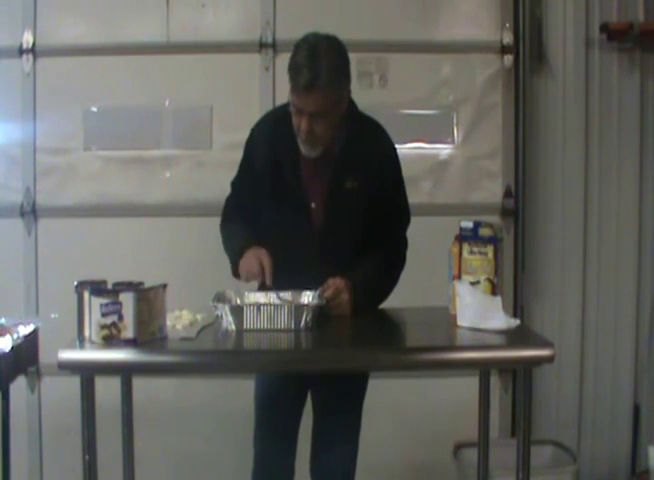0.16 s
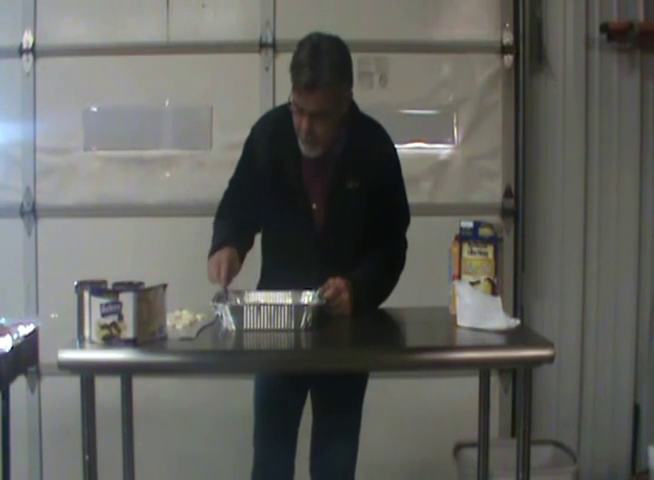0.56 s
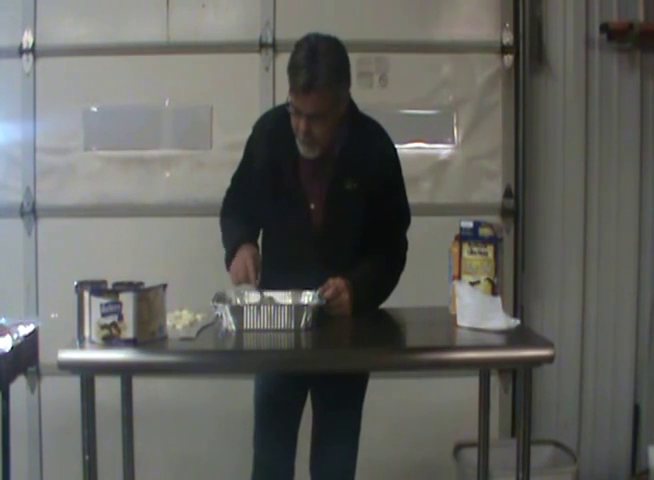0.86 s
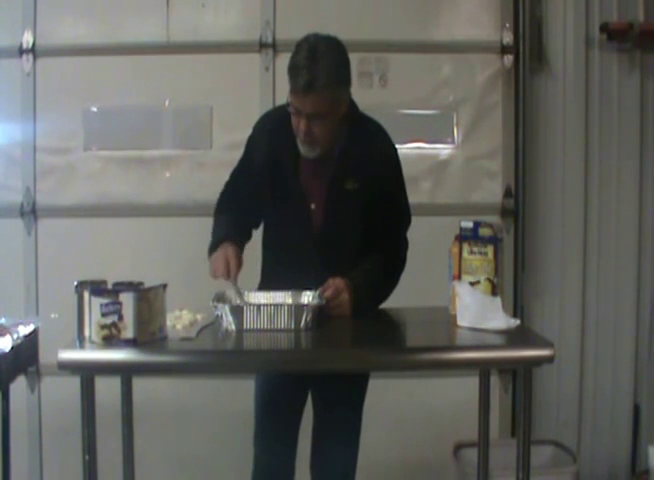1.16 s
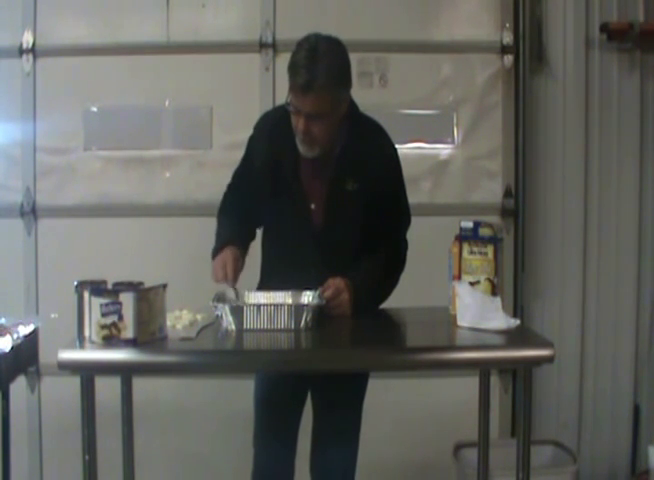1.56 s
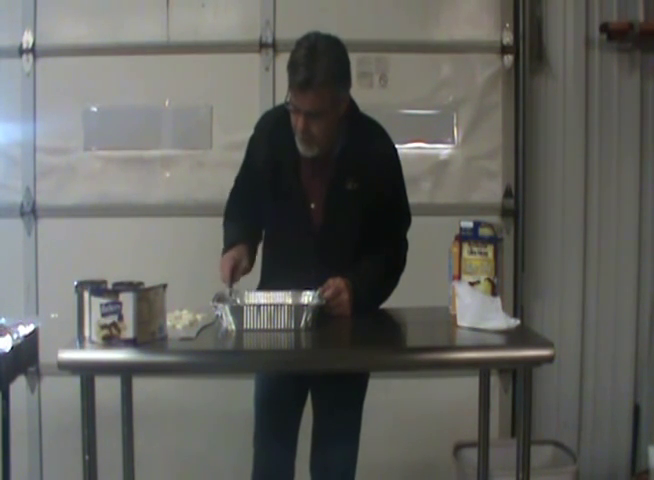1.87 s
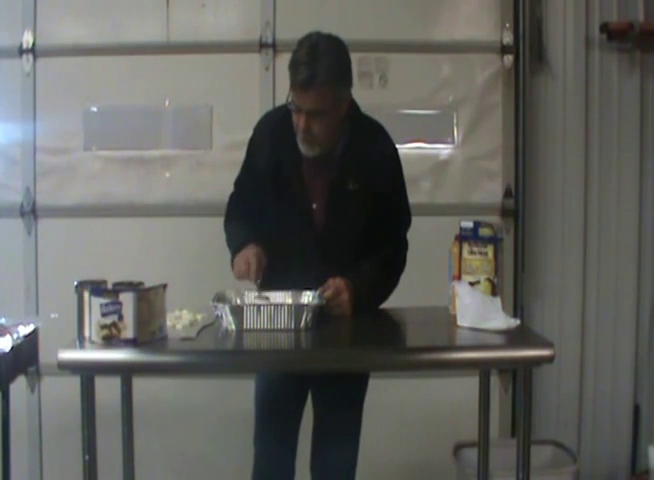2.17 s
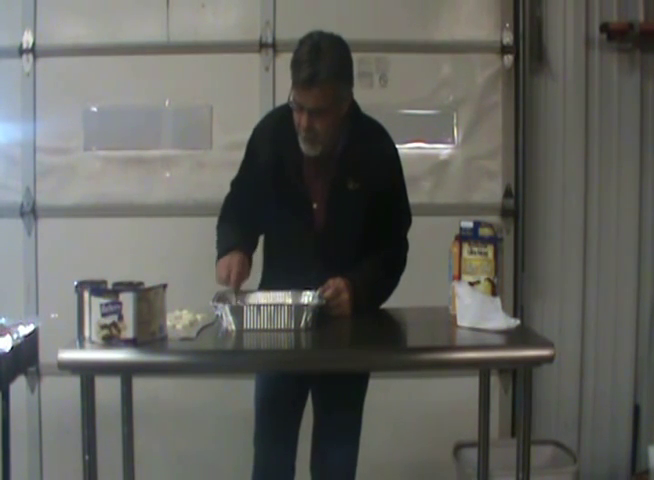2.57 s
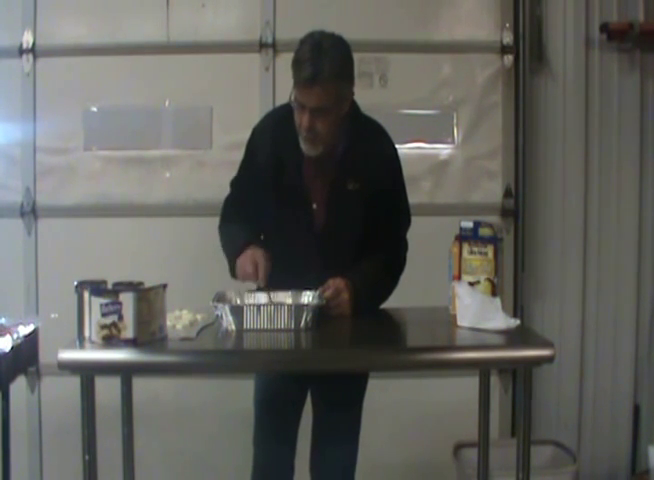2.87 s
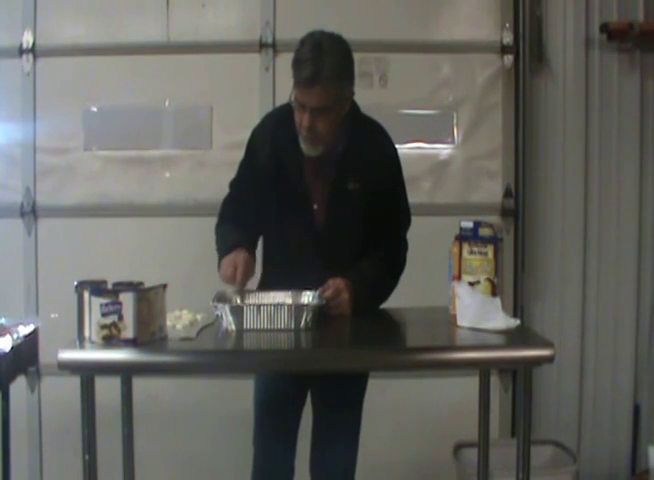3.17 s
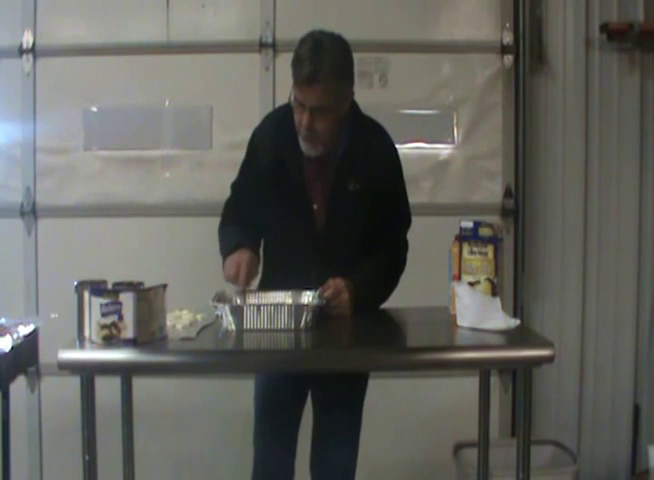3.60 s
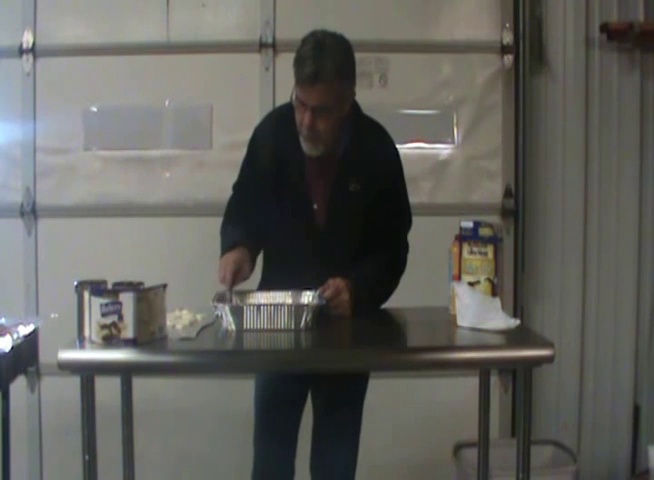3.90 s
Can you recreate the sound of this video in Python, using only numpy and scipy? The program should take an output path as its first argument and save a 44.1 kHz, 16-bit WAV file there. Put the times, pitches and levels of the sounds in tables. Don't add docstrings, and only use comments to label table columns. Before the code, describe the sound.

A utensil scrapes dry powder in a thin foil pan, with light taps, a tinny clatter and sharp metallic snaps over a low machine drone.

```python
import sys
import numpy as np
from scipy import signal
from scipy.fft import rfft, irfft
from scipy.io import wavfile

SR = 44100
rng = np.random.default_rng(int(sys.argv[2]) if len(sys.argv) > 2 else 0)


def ratio(d):
    e = np.asarray(d, float) / 20
    return 10 ** e


def wav_record(signal):
    frames = np.transpose(np.atleast_2d(signal))
    bounded = np.clip(frames, -1, 1)
    quanta = np.round(bounded * 32767).astype(np.int16)
    wavfile.write(sys.argv[1], SR, quanta)


N = 178252

DRONE_HZ = (106.2, 155.2)
# time in seconds, level in dB.
LOW_NOTE = [(0., -53), (.1, -53), (.83, -59), (1.1, -73.5), (1.57, -73), (1.75, -60.5), (2.37, -78.5),
            (2.55, -65.5), (3.34, -65), (3.58, -78), (3.72, -59), (4.04, -69)]
# frequency in Hz, level in dB.
CHURN_COLOUR = [(50, -48.5), (90, -19), (130, 5), (200, -1), (320, -2.5), (450, -33), (800, -71.5)]
# multiple of the mains frequency (a plain number), level in dB.
MAINS_OVERTONES = [(5, -77), (6, -82), (7, -79), (9, -77), (10, -84), (11, -85), (13, -86), (18, -83),
                   (24, -89), (34, -87)]
# frequency in Hz, level in dB.
WHINE = [(11719, -87), (12080, -94)]
# frequency in Hz, level in dB.
AIR_COLOUR = [(20, -22), (55, -1), (110, 2), (200, -6.5), (330, -14.5), (450, -20), (1000, -24.5),
              (2200, -24), (3800, -29), (5000, -26.5), (6500, -30), (11500, -30), (15750, -32),
              (16000, -76)]

# frequency in Hz, time to fall by 60 dB in seconds.
GARAGE_FADE = [(200, 0.49), (500, 0.26), (1200, 0.44), (2700, .5), (5000, 0.66), (8000, 0.75),
               (12000, 0.76)]
# frequency in Hz, level in dB.
GARAGE_COLOUR = [(200, 14), (700, 3.5), (2000, -1.3), (3000, 1.5), (4300, -0.5), (4900, 5.5), (5500, -0.5),
                 (8000, -0.5), (14000, -3)]
FAR_DB = (2.6, -0.64, -3.4)

# start in seconds, hardest moment in seconds,
# end in seconds, rasp level in dB, fizz against the rasp in dB.
STROKES = [(0., 0.007, 0.26, -69.5, -9), (.1, .36, 0.83, -71.5, 1), (0.447, 0.73, 0.85, -70.5, 1.5),
           (.78, .93, 1.7, -72.5, -2), (0.56, 0.594, 0.61, -61, -5), (1.086, 1.098, 1.25, -52, -4),
           (1.376, 1.38, 1.456, -58.5, -5.5), (2.194, 2.25, 2.305, -74, 6.5), (2.56, 2.63, 2.5, -77, 2),
           (2.716, 2.728, 2.752, -54.5, -1.5), (2.737, 2.79, 2.9, -75, 4), (3.052, 3.103, 3.16, -73, -4),
           (3.16, 3.2, 3.4, -72, -4), (3.225, 3.25, 3.3, -66.5, -4.5), (3.686, 3.715, 3.5, -71.5, -3),
           (3.796, 3.847, 3.88, -61.5, -3.5), (3.838, 3.883, 3.95, -57.5, -6.5),
           (3.87, 3.924, 3.935, -61, 7)]
# frequency in Hz, level in dB.
RASP_COLOUR = [(250, -37), (500, -16), (900, -3), (1400, -3.5), (2500, -3.5), (3300, -8), (4200, -21.5),
               (6500, -67)]
# frequency in Hz, level in dB.
FIZZ_COLOUR = [(2500, -18), (3800, -5.5), (4900, 0.5), (5800, -3.5), (7500, -3.5), (9500, -6), (12000, -18),
               (14500, -28), (16500, -45)]

# factor on the main pitch (a plain number), level in dB, time to fall by 60 dB in seconds.
HARD_THUD = [(1.024, 13.5, 0.0059), (2., -3.5, 0.012), (.55, -12, 0.014), (1.45, -8, 0.0083)]
HARD_WALL = [(1.03, -0.5, 0.013), (0.862, -6, 0.008), (1.167, -9, 0.0066)]
LIGHT_THUD = [(1.005, 0, 0.013), (1.94, -13.5, 0.0084), (0.554, -11, 0.011), (1.4, -18.5, 0.011)]
LIGHT_WALL = [(0.989, -2, 0.0083), (0.69, -19.5, 0.0072), (0.63, -21.5, 0.0069)]
# frequency in Hz, level in dB.
CRACKLE_COLOUR = [(600, -33.5), (1200, 0), (2500, -9.5), (3800, -5.5), (4800, -4), (5700, -0.5), (7000, 0),
                  (9000, -5), (11000, -11), (13000, -22), (16500, -36)]
# frequency in Hz, level in dB.
SHIVER_COLOUR = [(200, -13.5), (500, 3.5), (1000, -1), (2500, -0.5), (3900, -2.5), (4800, -5),
                 (8000, -15.5), (12000, -22.5), (16500, -38.5)]

# time in seconds, level in dB, pitch in Hz, crackle against the tap in dB.
TAPS = [(.13, -52, 1070, -12), (.318, -49, 1070, -14), (.58, -50, 1290, 5), (0.591, -42.5, 1410, -7),
        (.637, -46.5, 1050, -21), (.687, -56, 1410, -2.5), (.981, -51.5, 1190, -14),
        (1.38, -46.5, 950, -12), (1.388, -45, 920, -15), (2.632, -58, 1260, -5), (2.7212, -30, 1098, -18),
        (2.7244, -49, 420, -3), (2.7293, -40.5, 1100, -1), (2.737, -46, 1340, 5), (3.184, -56.5, 1140, -6),
        (3.193, -49.5, 1180, -5), (3.21, -45, 1220, -17), (3.251, -57, 820, -5), (3.259, -52, 1250, -9),
        (3.306, -56, 332, -12), (3.664, -56.5, 1090, -14), (3.811, -58, 1370, -5), (3.852, -41.5, 1340, -1),
        (3.875, -51, 1400, .3), (3.888, -47, 1240, -13), (3.9, -51, 1510, -5), (3.911, -59, 1300, 9)]
# time in seconds, level in dB, pitch in Hz, crackle against the ring in dB.
PINGS = [(.292, -60, 7560, -1), (.564, -50, 7100, -1.5), (1.356, -50, 2420, -1), (1.383, -42.5, 2800, -4),
         (1.388, -39, 2390, -9.5), (1.391, -48, 5320, 3), (1.421, -61, 2300, 1), (1.483, -67, 1700, 12),
         (2.619, -58, 1710, -3), (2.7243, -43, 2700, 4), (2.7308, -43, 2400, -6), (2.7674, -46, 1540, 1),
         (2.789, -55, 5650, -14), (3.3426, -43.5, 1510, -13), (3.6472, -41, 4800, -18),
         (3.7966, -48.5, 2030, -2), (3.854, -42.5, 4870, -7), (3.836, -52, 3270, -1.5),
         (3.849, -38, 1570, -4)]
# time in seconds, thud in dB, thud pitch
# in Hz, wall ring against the thud in dB, wall pitch in Hz.
CLATTER = [(1.0324, -13.5, 642, -12.5, 3100), (1.038, -23, 666, -21, 5400), (1.049, -29.5, 970, -6, 2340),
           (1.066, -24, 620, -11, 3040), (1.072, -23.5, 700, -13, 4750), (1.098, -24, 705, -14.5, 4700),
           (1.1066, -22, 635, -13.5, 4600), (1.111, -31.5, 1140, -16, 2400),
           (1.1153, -18.5, 412, -16, 4740), (1.12, -25, 656, -13, 2810), (1.127, -14.5, 576, -5.5, 3030),
           (1.1318, -25, 694, -8.5, 3120), (1.137, -31, 580, -27, 4640), (1.1445, -32, 376, -6, 2320)]
# time in seconds, wall in dB, wall pitch in Hz,
# thud against the wall in dB, thud pitch in Hz.
SNAPS = [
    (1.7013, -17, 2250, -2.5, 797),
    (1.7055, -18, 2640, -4.5, 890),
    (1.7185, -30.5, 2250, -8, 357),
    (1.7665, -27.5, 2620, -2.5, 660),
    (1.7732, -5.5, 2380, -15, 420),
    (1.775, -18.5, 2460, -10.5, 346),
    (1.7809, -29, 2380, -22, 593),
    (1.79, -34, 3840, 0, 1320),
    (1.8041, -22.5, 2440, -9.5, 1220),
]
# time in seconds, high ring in dB, its pitch in Hz,
# low ring in dB, its pitch in Hz.
SHAKES = [
    (1.7015, -23.5, 4630, -27.5, 203),
    (1.702, -25, 6770, -40, 298),
    (1.7057, -19.5, 4630, -33.5, 480),
    (1.7728, -36, 6350, -21.5, 1240),
    (1.7739, -16.5, 1660, -57, 730),
    (1.7743, -48, 3300, -24, 280),
]


def evened(x):
    return x / np.sqrt(np.mean(x ** 2) + 1e-20)


def peaked(x):
    return x / abs(x).max()


def read(points, hz):
    f, value = np.transpose(points)
    return np.interp(np.log(hz + 1), np.log(f + 1), value)


def tinted(x, colour):
    gain = ratio(read(colour, np.fft.rfftfreq(len(x), 1 / SR)))
    return irfft(rfft(x) * gain, len(x))


def wander(hz):
    t = np.arange(N) / SR
    waves = (np.sin(2 * np.pi * (f * t + rng.random())) / np.sqrt(f) for f in np.geomspace(hz / 15, hz, 16))
    return evened(sum(waves))


def air():
    low_db = np.interp(np.arange(N) / SR, *np.transpose(LOW_NOTE))
    churn = ratio(low_db - 11.5) * evened(tinted(rng.standard_normal(N), CHURN_COLOUR))
    return ratio(-59) * evened(tinted(rng.standard_normal(N), AIR_COLOUR)) + churn


def hum():
    t = np.arange(N) / SR
    low_db = np.interp(t, *np.transpose(LOW_NOTE))
    high_db = -55 - 21.5 * np.exp(-t / 0.92)
    out = np.zeros(N)
    for hz, db in zip(DRONE_HZ, (low_db, high_db)):
        turns = np.cumsum(hz + 0.26 * wander(4.7)) / SR
        out += np.sqrt(2) * ratio(db + 1.2 * wander(10.0)) * np.sin(2 * np.pi * turns)
    mains_hz = 59.75
    buzz = [(k * mains_hz, db) for k, db in MAINS_OVERTONES]
    for hz, db in buzz + list(WHINE):
        out += np.sqrt(2) * ratio(db + 0.75) * np.sin(2 * np.pi * (hz * t + rng.random()))
    return out


def garage(x):
    echoes = np.zeros(SR)
    at = np.arange(560, SR - 16, 16)
    echoes[at + rng.integers(0, 16, len(at))] = rng.choice([-1., 1.], len(at))
    hz, t, bands = signal.stft(echoes, SR, nperseg=256)
    fade_db = read(GARAGE_COLOUR, hz)[:, None] - 60 * t / read(GARAGE_FADE, hz)[:, None]
    tail = signal.istft(bands * ratio(fade_db), SR, nperseg=256)[1]
    return signal.fftconvolve(x, tail / np.linalg.norm(tail))[:N]


def grit(per_s, spread_db, colour):
    size = ratio(spread_db * np.minimum(rng.exponential(1, N), 4)) * rng.standard_normal(N)
    hits = rng.random(N) < per_s / SR
    return evened(tinted(size * hits, colour))


def scrape():
    t, rasp, fizz = np.arange(N) / SR, np.zeros(N), np.zeros(N)
    fade_db, roundness = -17, 2.45
    for start, top, end, db, fizz_db in STROKES:
        before = (top - t) / max(top - start, .005)
        after = (t - top) / max(end - top, .005)
        away = np.where(t < top, before, after)
        power = ratio(db + fade_db * np.minimum(away, 3) ** roundness) ** 2
        rasp += power
        fizz += power * ratio(fizz_db) ** 2
    clumps = ratio(2.2 * wander(90.))
    coarse = clumps * np.sqrt(rasp) * grit(3500, 0.73, RASP_COLOUR)
    fine = np.sqrt(fizz) * grit(9000, 2.86, FIZZ_COLOUR)
    return coarse + fine


def ring(t, hz, db, t60):
    return ratio(db - 60 * t / t60) * np.sin(2 * np.pi * hz * t)


def struck(t, hz, modes, rise_s, chance):
    body = 0
    for (factor, db, t60), c in zip(modes, np.r_[0, chance]):
        body = body + ring(t, hz * factor * (1 + 0.09 * c), db, t60)
    return peaked(body * (1 - np.exp(-(t / rise_s) ** 2)))


def buckle(row, modes, chance, noise):
    s, thud_db, thud_hz, wall_db, wall_hz, crackle_db = row
    thud_modes, wall_modes = modes
    t = np.arange(noise.shape[1]) / SR
    snap_db = -60 * t * 70 * max(wall_db + 14, 0)
    thud = struck(t, thud_hz, thud_modes, .0012, chance)
    wall = peaked(struck(t, wall_hz, wall_modes, 0.00037, chance[4:]) * ratio(snap_db))
    crackle_fade = ratio(snap_db - 60 * t / 0.012) * np.minimum(t / 0.00058, 1)
    crackle = peaked(tinted(noise[0], CRACKLE_COLOUR) * crackle_fade)
    shiver_fade = ratio(-60 * t / 0.039) * np.minimum(t / 0.0052, 1)
    shiver = evened(tinted(noise[1], SHIVER_COLOUR)) * shiver_fade
    shiver_db = max(thud_db, wall_db) - 20
    return (ratio(thud_db) * thud + ratio(wall_db) * wall
            + ratio(crackle_db + 2.5) * crackle + ratio(shiver_db) * shiver)


def spread(row):
    s, thud_db, thud_hz, wall_db, wall_hz, crackle_db = row
    colour = [(130, thud_db - 19), (thud_hz, thud_db + 0.088), (wall_hz + 50, wall_db - 5.5),
              (7500, crackle_db - 12), (16500, crackle_db - 35)]
    click = tinted(signal.unit_impulse(512), colour)
    return np.roll(click, 256)[192:]


def contacts():
    taps = [(s, db, hz, db - 10, 2370, db + c) for s, db, hz, c in TAPS]
    pings = [(s, db - 20 * hz / 1900, 950, db, hz, db + c) for s, db, hz, c in PINGS]
    clatter = [(s, db, hz, db + up, wall_hz, db + up) for s, db, hz, up, wall_hz in CLATTER]
    rim = [(s + 0.00036, db - 10.5, 1180, db - 17.5, 4850, db - 29.5) for s, db, *_ in CLATTER]
    snaps = [(s, db + low, thud_hz, db, hz, db - 8) for s, db, hz, low, thud_hz in SNAPS]
    shakes = [(s, low_db, low_hz, db, hz, db - 13) for s, db, hz, low_db, low_hz in SHAKES]
    hard, light = (HARD_THUD, HARD_WALL), (LIGHT_THUD, LIGHT_WALL)
    clatter_far, snap_far, light_far = FAR_DB
    return [(clatter, hard, clatter_far), (snaps, hard, snap_far), (taps + pings, light, light_far),
            (rim, light, clatter_far), (shakes, light, snap_far)]


def pan():
    out = np.zeros((2, N + 2048))
    for rows, modes, far_db in contacts():
        for row in rows:
            at = round(row[0] * SR)
            chance, noise = rng.uniform(-0.52, 1, 7), rng.standard_normal((2, 2048))
            out[0, at:at + 2048] += buckle(row, modes, chance, noise)
            out[1, at:at + 320] += spread(row) * ratio(far_db)
    low_cut_hz = 172.0
    low_cut = signal.butter(3, low_cut_hz, "high", fs=SR, output="sos")
    return signal.sosfilt(low_cut, out[:, :N])


def scene():
    straight, around = pan()
    strokes = scrape()
    echo = garage(ratio(13.5) * around + ratio(-14.0) * strokes)
    return (straight + strokes + echo + hum() + air())[None]


def band_limit(x):
    return signal.sosfilt(signal.butter(12, 16810, fs=SR, output="sos"), x)


def record(dry):
    edge_hz, offset = 16750, -.0131
    treble_cut = signal.firwin(255, edge_hz, window=("kaiser", 9), fs=SR)
    limited = signal.oaconvolve(dry, treble_cut[None], "same")
    return band_limit(limited + offset)


dry = scene()
out = record(dry)
wav_record(out)
```